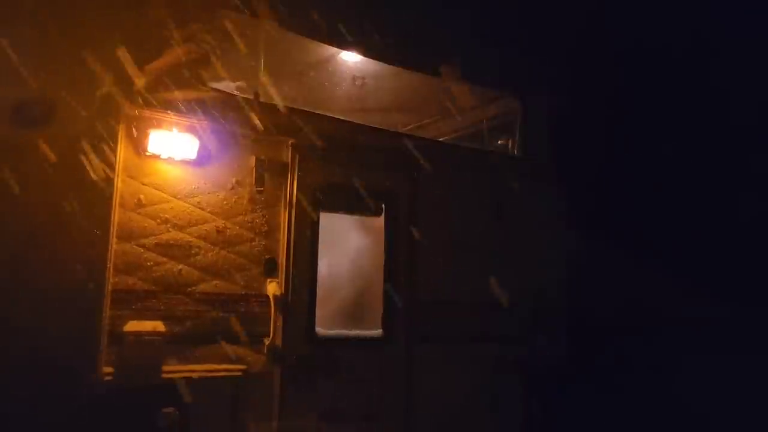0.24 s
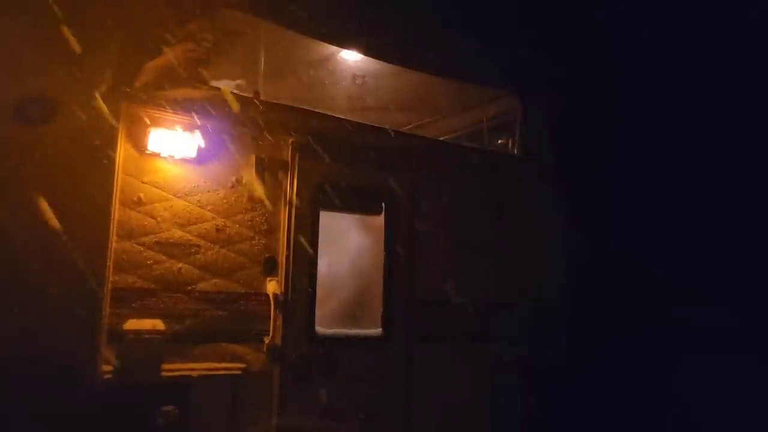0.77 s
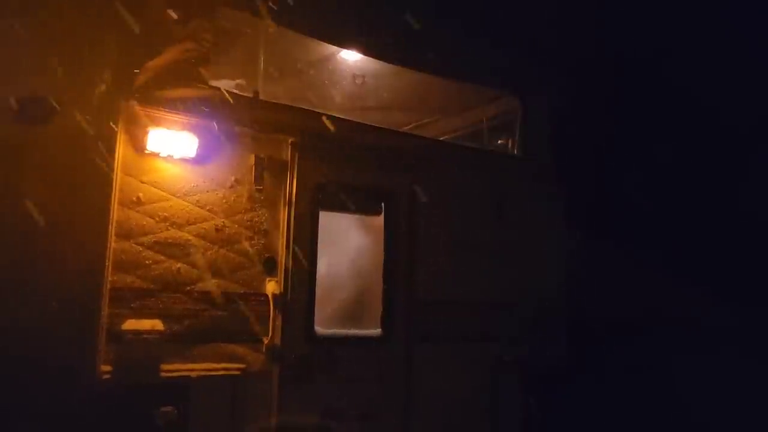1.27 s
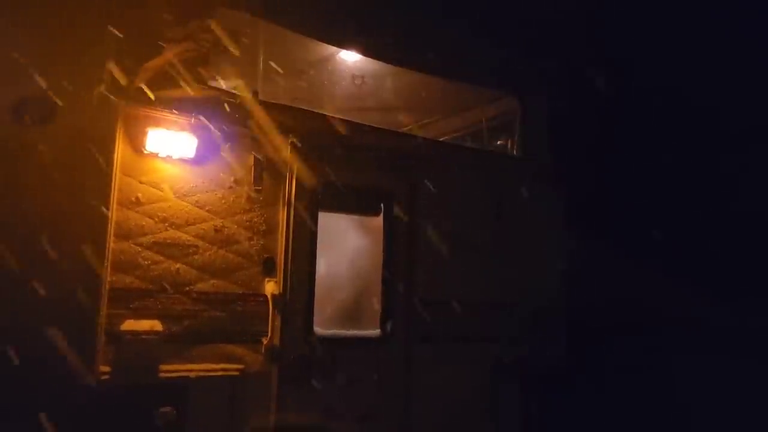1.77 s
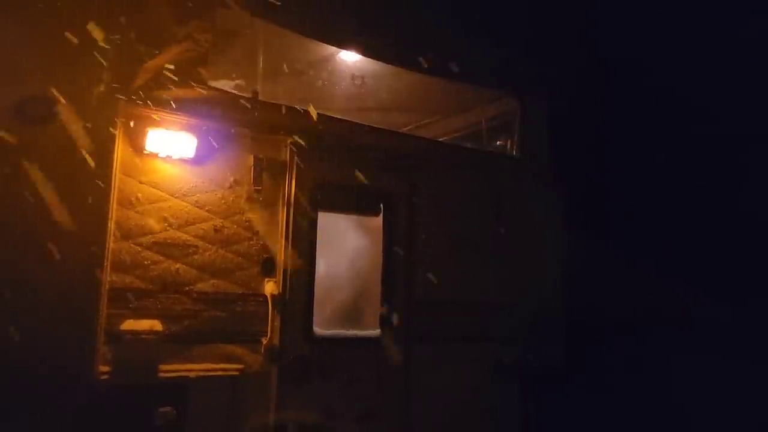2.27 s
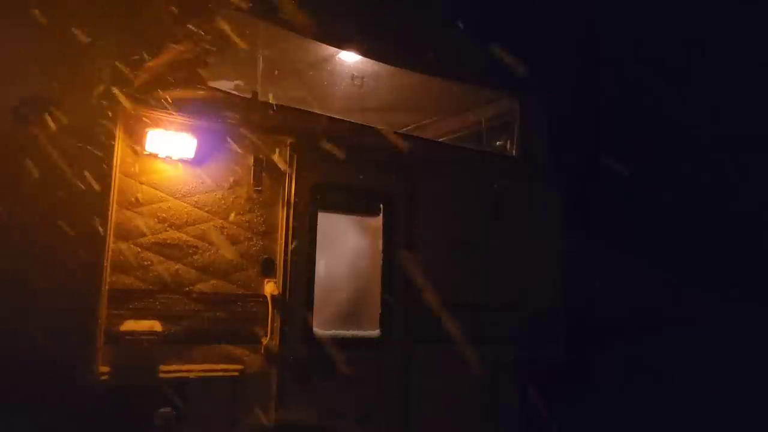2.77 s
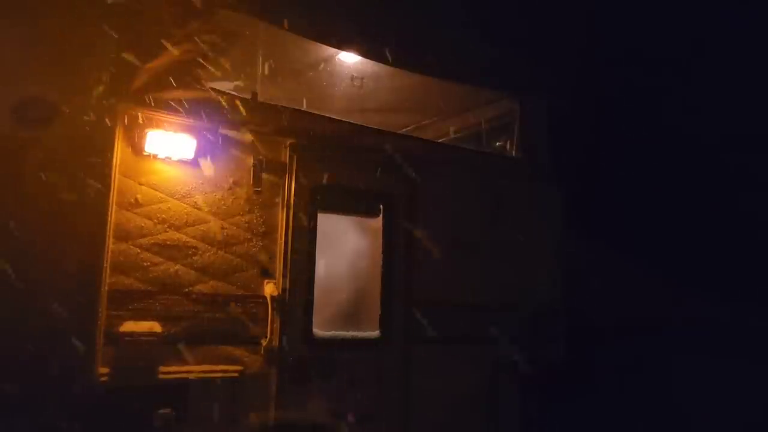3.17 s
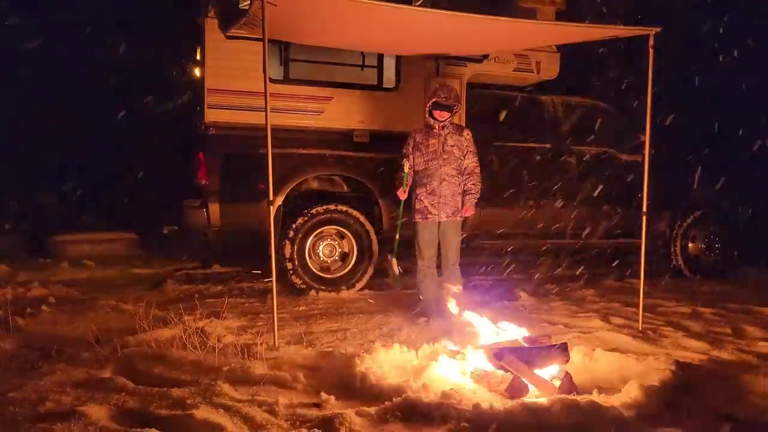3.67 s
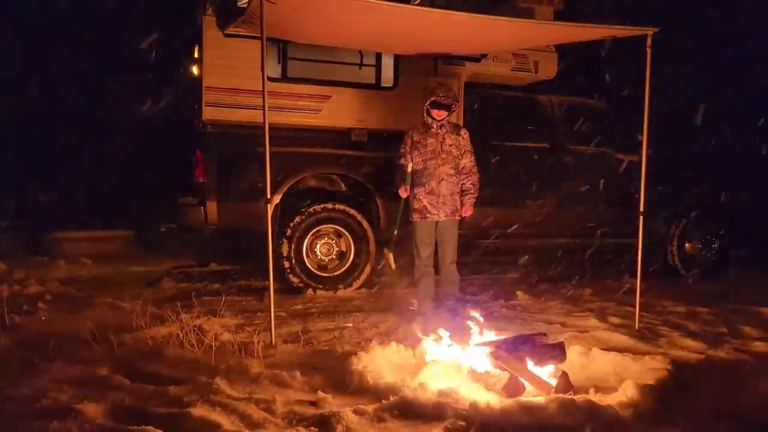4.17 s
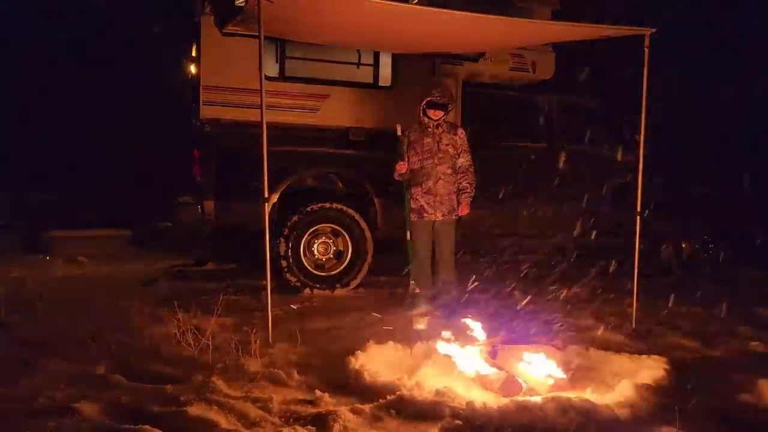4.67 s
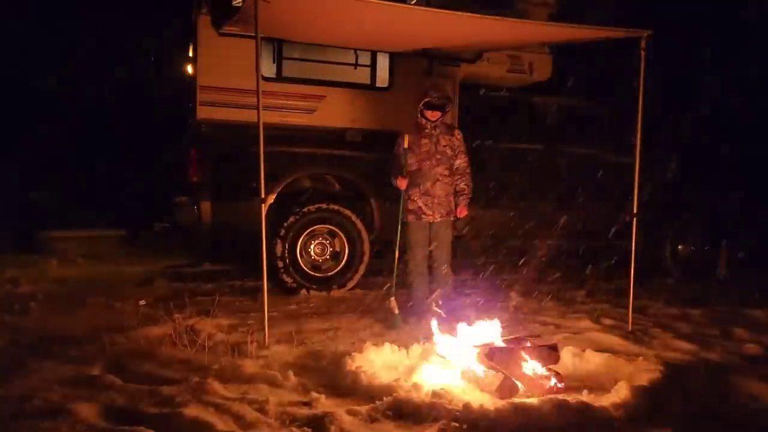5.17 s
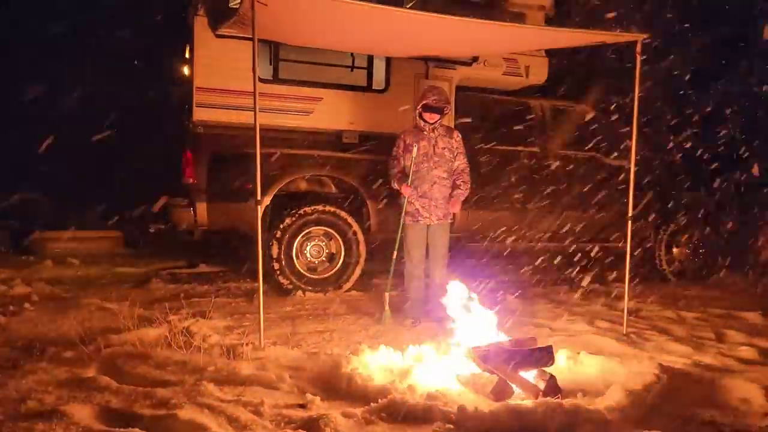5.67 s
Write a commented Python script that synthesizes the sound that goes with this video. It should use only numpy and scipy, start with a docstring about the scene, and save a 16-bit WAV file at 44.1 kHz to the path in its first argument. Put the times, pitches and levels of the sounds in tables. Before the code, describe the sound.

Storm wind and sleet are heard outdoors for about six seconds. From the first instant, gusts buffet the microphone with a lumpy low rumble, quick flutters that shift between left and right, and irregular dull thumps, strongest around 0.6, 1.1, 2.2 and 2.8 seconds. A faint roar of air lies behind. Over this runs a steady, bright, grainy hiss of ice pellets landing on everything nearby. Single pellets tick sharply on the microphone housing, on one side or the other, some with a tiny brief ring. They stand out around 0.3, 1.0 to 1.3, 1.7 and 2.1 seconds, with the sharpest on the left at 3.3 seconds. At about 3.6 seconds the hiss drops, as though in a more sheltered place, and ticks become sparser. The wind eases around 4.5 seconds, then gusts again from about 5 to 5.7 seconds, with a couple of ticks on the right.

```python
"""Storm wind and sleet at night

Wind buffets the two microphone openings (ports) of a small camera: a lumpy rumble with single thumps.
Driven ice pellets hiss on everything near, and some tick on the housing beside one port. Some strikes
ring briefly, at times together with a tick. After about 3.6 s the camera is in a more sheltered place
and the hiss drops."""
import sys
import numpy as np
from scipy import signal
from scipy.fft import rfft, irfft
from scipy.io import wavfile
from scipy.ndimage import uniform_filter1d

SR = 44100
rng = np.random.default_rng(int(sys.argv[2]) if len(sys.argv) > 2 else 0)


def persist_wave(psi):
    """Save psi, clipped to +-1, as 16-bit WAV."""
    counts = np.round(np.clip(psi, -1, 1) * 32767).astype(np.int16)
    wavfile.write(sys.argv[1], SR, np.atleast_2d(counts).T)


N = 261513  # samples, about 5.9 s
PORT_LAG = 22  # samples that sound needs to reach the far port


def gain(db):
    """Turn decibels into a number to multiply by."""
    return 10 ** (np.asarray(db) / 20)


def unit_power(x):
    """Scale a signal to an average power of 1."""
    return x / np.sqrt(np.mean(x ** 2) + 1e-20)


def at_pitch(table, hz):
    """Read a table's columns at these frequencies, gliding between rows."""
    pitches, *columns = np.transpose(table)
    return np.array([np.interp(np.log(hz + 1), np.log(pitches + 1), c) for c in columns])


def at_time(table, t):
    """Read a table's columns at these times, gliding between rows."""
    times, *columns = np.transpose(table)
    return [np.interp(t, times, c) for c in columns]


def sides(pan_db):
    """Left and right gains: the far port is turned down."""
    return gain(np.minimum(0, np.array([pan_db, -pan_db])))


def add(mix, start_s, sound):
    """Mix a sound in at its start time."""
    part = mix[:, max(round(start_s * SR), 0):][:, :sound.shape[1]]
    part += sound[:, :part.shape[1]]


def lumpy_noise(tone, likeness, size, lumps_db, bins, frames):
    """Partly alike left and right noise with random loud spots, `bins` tall and `frames` long."""
    hz = np.fft.rfftfreq(size, 1 / SR)
    a, b, c, d, lumps = rng.standard_normal((4 * N // size + 6, len(hz), 5)).T
    lumps = unit_power(uniform_filter1d(uniform_filter1d(lumps, bins, 0), frames, 1))
    alike = np.clip(likeness(hz), -1, 1)[..., None]
    left, unrelated = a + 1j * b, c + 1j * d
    spectra = np.array([left, alike * left + np.sqrt(1 - alike ** 2) * unrelated])
    spectra *= gain(at_pitch(tone, hz)[0][:, None] + lumps_db * lumps)
    spectra[:, hz >= tone[-1][0]] = 0  # silent above the table's last row
    return unit_power(signal.istft(spectra, nperseg=size, noverlap=3 * size // 4)[1][:, :N])


# Slow changes in the wind: (time [s], rumble level [dB], roar level [dB])
WIND_STRENGTH = [(0.0, -15.5, -53), (0.08, -38, -50), (0.21, -28, -47.5), (0.3, -39.5, -50),
                 (0.51, -28, -47), (0.68, -31, -51), (0.83, -32.5, -48.5), (1.32, -33.5, -50),
                 (1.45, -33.5, -50), (1.78, -33, -47.5), (2.23, -34.5, -52), (2.48, -32, -50),
                 (2.69, -34, -48), (2.94, -38, -49), (3.07, -35, -51.5), (3.4, -31, -50),
                 (3.53, -36, -49.5), (3.8, -44, -49.5), (3.93, -31.5, -51), (4.11, -38.5, -48),
                 (4.41, -41.5, -50), (4.64, -45, -47.5), (4.79, -36, -46), (5.04, -32, -45),
                 (5.47, -32, -51.5), (5.65, -28, -47), (5.93, -51, -49)]
# Quick gusts across a port: (time [s], flutter level [dB], lean to the left [dB, used at 0.8 times])
GUSTS = [(0.0, -39, -4), (0.03, -43, -7), (0.13, -42, 10), (0.2, -47, -11), (0.36, -36, 2),
         (0.43, -35.5, -17), (0.48, -29.5, -13), (0.58, -25.5, -17), (0.64, -37, -4), (0.78, -40, -6),
         (0.86, -36.5, -6), (0.91, -44, -3), (1.02, -39, 4), (1.07, -44, 9), (1.25, -41, 9.5),
         (1.32, -50, -1.5), (1.42, -39, -13), (1.45, -38.5, -10), (1.6, -33.5, -16), (1.65, -46, -15),
         (1.77, -43, -10), (1.83, -41, -6.5), (1.9, -37, 9), (1.95, -36.5, -13), (2.06, -40.5, -12),
         (2.11, -38.5, -1), (2.18, -34, 5), (2.21, -43.5, -11), (2.51, -41.5, -11), (2.54, -33.5, -7),
         (2.59, -40, -4), (2.69, -40.5, -6), (2.76, -36, 4), (2.84, -31.5, 1.5), (2.87, -42, -0.5),
         (2.96, -42, -5), (3.34, -36, -7), (3.45, -38, -9), (3.6, -35.5, -2), (3.65, -41.5, 16),
         (3.71, -33, 16), (3.76, -37, 2), (3.83, -34, 13), (3.88, -44, -7), (3.96, -36, -6.5),
         (4.01, -36.5, -0.5), (4.08, -42, 0), (4.23, -39.5, -12), (4.36, -48, -19), (4.39, -34, -6),
         (4.49, -49.5, -11), (4.56, -41, 0), (4.84, -38.5, 6), (4.94, -40.5, -1), (5.02, -40.5, -5),
         (5.2, -33.5, 6), (5.24, -41, 13), (5.32, -25.5, 0), (5.38, -39.5, 3), (5.4, -37, -2),
         (5.55, -33, 8), (5.6, -36.5, 0.0), (5.93, -39.5, 2)]
# The tone of each wind noise: (frequency [Hz], relative level [dB])
RUMBLE_TONE = [(12, -13), (28, 19), (45, 9), (62, 9.5), (90, 6.5), (130, -32)]
FLUTTER_TONE = [(60, -9.5), (100, 16), (140, 7), (200, -3.5), (280, -7.5), (420, -19), (600, -33)]
ROAR_TONE = [(150, -23), (240, 0), (330, -6), (450, -9), (650, -9.5), (1000, -21), (1500, -22), (2200, -51)]
# How alike the roar is at both ports: (frequency [Hz], likeness [1 same, -1 opposite])
ROAR_LIKENESS = [(130, 0.97), (300, 1), (650, 0.7), (1000, 0.7), (1400, -0.8)]

def wind():
    """Broad swirls of air rumble at both ports, small ones flutter at one, and air further off roars."""
    t = np.arange(N) / SR
    rumble_db, roar_db = at_time(WIND_STRENGTH, t)
    flutter_db, lean_db = at_time(GUSTS, t)
    rumble = lumpy_noise(RUMBLE_TONE, lambda hz: .85, size=2048, lumps_db=2, bins=3, frames=3)
    flutter = lumpy_noise(FLUTTER_TONE, lambda hz: .75, size=1024, lumps_db=3, bins=4, frames=3)
    roar = lumpy_noise(ROAR_TONE, lambda hz: at_pitch(ROAR_LIKENESS, hz)[0],
                       size=1024, lumps_db=1, bins=18, frames=6)
    flutter *= gain(flutter_db + lean_db * np.array([[.4], [-.4]]))
    return gain(rumble_db) * rumble + flutter + gain(roar_db) * roar


def patter(per_s, spread_db, cycles):
    """Tiny pellets of many sizes each ring for a few cycles; each port hears different ones."""
    strength = gain(spread_db * np.minimum(rng.exponential(1, (2, N)), 4))
    hits = strength * (rng.random((2, N)) < per_s / SR)
    pitches = np.geomspace(1200, 15000, 14)
    kind = rng.choice(len(pitches), (2, N), p=pitches / pitches.sum())
    out = np.zeros((2, N))
    for k, hz in enumerate(pitches):
        t = np.arange(int(2 * cycles * SR / hz)) / SR
        grain = np.sin(2 * np.pi * hz * t) * t * np.exp(-t * hz / cycles * 4.7)
        out += signal.oaconvolve(hits * (kind == k), grain[None] / np.linalg.norm(grain), axes=1)[:, :N]
    return unit_power(out)


# How hard the sleet falls:
# (time [s], hiss level before SWELL_STRETCH [dB], left minus right [dB], boost from coarse pellets [dB])
SLEET_STRENGTH = [(0, -37, -1, 0), (.04, -36.5, -1, -0.5), (.2, -36.5, 1.5, 0), (.27, -35.5, -1, 2),
                  (.31, -36.5, 1, 1.5), (.66, -36.5, -0.5, 0), (.73, -36, -0.5, 0.5), (.8, -36, -0.5, -1),
                  (1.1, -36, -1, -0.5), (1.25, -36.5, -2, -1), (1.285, -35.5, -0.5, 3),
                  (1.32, -36.5, -1, 0.5), (1.55, -36, 0.5, -1.5), (1.75, -37, 1, 0.5),
                  (2.06, -35.5, -1, -1.5), (2.16, -36.5, 1, -1.5), (2.195, -35.5, -1, 3.5),
                  (2.23, -36.5, 0, -1), (2.6, -36, -0.5, -1), (2.85, -36, -1, -1.5), (3.2, -36, -.5, 0),
                  (3.4, -36.3, -.5, 0), (3.55, -36.5, -1, 0), (3.585, -35.5, -4.5, 2),
                  (3.65, -39.5, 0.5, -1), (3.78, -40, -0.5, 2), (3.9, -39, 0, 1.5), (4.21, -39, 0, 1),
                  (4.5, -38, -1, 0.5), (5.05, -39, -0.5, 1.5), (5.4, -38.5, -1, 1), (5.7, -38.5, 0, 1),
                  (5.93, -39.5, 1, 0.5)]
# How much the hiss's rises and dips in dB are enlarged: (frequency [Hz], stretch [times])
SWELL_STRETCH = [(1000, 1.2), (3000, 2.3), (8000, 1.57), (14000, 2.65)]
# The tone each port gives the ice: (frequency [Hz], left relative level [dB], right relative level [dB])
PORT_TONE = [(600, -32, -30), (1000, -21, -19), (1400, -19, -16), (2000, -18, -11), (2800, -17, -9),
             (3600, -14, -9), (4600, -14, -7), (5600, -11, -10), (7600, -8, -13), (8600, -12, -17),
             (9600, -13, -22), (10400, -10, -17), (11500, -6, -11), (12900, 0, -10.5), (14000, -4.5, -13.5),
             (15200, -5, -14)]
# The hiss dies away in the highest treble: (frequency [Hz], level change [dB])
TREBLE_FADE = [(15400, 0), (15650, -5), (15850, -55)]

def sleet(near_share=.33, coarse_hz=3300):
    """Far pellets merge into a hiss while near ones stay grainy; each port shapes their tone."""
    near = np.sqrt(near_share) * patter(per_s=2500, spread_db=1.5, cycles=4.3)
    far = np.sqrt(1 - near_share) * rng.standard_normal((2, N))
    pellets = near + far
    pellets[1] += .1 * np.roll(pellets[0], PORT_LAG)  # a little of the left reaches the right port
    slicing = dict(nperseg=512, noverlap=384)
    hz, t, spectra = signal.stft(pellets, SR, **slicing)  # indexed by port, frequency, time
    level_db, pan_db, coarse_db = at_time(SLEET_STRENGTH, t)
    clumps = uniform_filter1d(rng.standard_normal((len(t), 2)), 4, 0)  # pellets land in clumps
    patches = rng.standard_normal((len(t), len(hz), 2)).T  # the tone flickers too
    patches = uniform_filter1d(uniform_filter1d(patches, 20, 1), 10, 2)
    flicker_db = 1.1 * (unit_power(clumps).T[:, None] + unit_power(patches))
    tone_db = at_pitch(PORT_TONE, hz) + at_pitch(TREBLE_FADE, hz)
    spectra *= gain(tone_db[:, :, None] + flicker_db)
    mono = signal.istft(spectra.mean(0), **slicing)[1]
    spectra /= np.sqrt(np.mean(mono ** 2))
    coarse_band = np.exp(-np.log((hz[:, None] + 1) / coarse_hz) ** 2 / 1.9)  # coarse pellets sound lower
    swell_db = at_pitch(SWELL_STRETCH, hz)[0][:, None] * (level_db - level_db.mean())
    side_db = np.array([.5, -.5])[:, None, None] * pan_db
    spectra *= gain(level_db.mean() + swell_db + coarse_db * coarse_band + side_db)
    return signal.istft(spectra, **slicing)[1][:, :N]


# Large swirls of air that press on both ports:
# (middle time [s], level [dB], pitch [Hz], length of the loud part [ms], left minus right [dB])
THUMPS = [(0.009, -25, 54.4, 7.5, 0), (0.05, -25, 49.5, 19, -1), (0.094, -26.5, 68.6, 20.6, 1),
          (0.164, -24, 49.1, 58, 0), (0.264, -26.5, 57.5, 30, -3), (0.447, -21.5, 72, 17.3, -6),
          (0.491, -30, 90, 24, 1), (0.547, -20, 76, 11.7, 5), (0.609, -16, 70, 28.6, -4),
          (0.653, -20, 56, 47, 1), (0.807, -21, 54.3, 45, 1), (0.862, -28, 106, 10.3, -4),
          (0.915, -28.5, 61.4, 27.5, 2), (0.999, -31, 94, 26, -3), (1.1, -18.5, 71.5, 19, -4),
          (1.286, -28.5, 48.6, 33.7, -10), (1.333, -24.5, 61, 29, 5), (1.441, -28.5, 52, 16, 2),
          (1.575, -25, 60, 19.6, -4), (1.6, -22, 77, 18, -8), (1.628, -23.5, 37.7, 29.5, -7),
          (1.641, -24.5, 50, 11, 4), (1.744, -23, 69.6, 12.6, 1), (1.768, -26, 48, 19.6, 2),
          (1.827, -32, 50, 22, -4), (1.864, -20.5, 53, 20.7, -1), (1.935, -25, 63.8, 52, -3),
          (2.0, -25, 71, 13.3, -5), (2.088, -30, 60, 35, 2), (2.189, -17, 70.5, 20.8, 3),
          (2.281, -24.5, 45.2, 18.4, -2), (2.321, -32, 52, 16, 4), (2.411, -22.5, 57, 15.6, -1),
          (2.483, -20, 56, 28, 2), (2.55, -22.5, 38.2, 26, 2), (2.632, -22, 49.7, 28, -1),
          (2.759, -18, 67.6, 21.3, 5), (2.785, -24, 36, 10.5, 9), (2.827, -23.5, 76, 12, 0),
          (2.99, -33, 40, 17, 0), (3.161, -29, 69, 9.7, 1), (3.218, -21.5, 69, 16, 3),
          (3.254, -35, 95, 14, -13), (3.318, -20, 62.3, 19, -2), (3.377, -36, 67, 17, 0),
          (3.418, -29.5, 61, 29, 2), (3.466, -22, 54.7, 19, 1), (3.561, -25.5, 53.2, 48, -1),
          (3.59, -33, 81, 25, -3), (3.73, -26.5, 106, 16, 9), (3.815, -27, 94, 17, 5),
          (3.842, -28.5, 91, 15, 14), (3.98, -28.5, 45.2, 39, 3), (4.025, -23.5, 77.5, 15, 0),
          (4.116, -29.5, 48, 15, 2), (4.606, -29, 47.3, 36, 0), (4.68, -30.5, 70.6, 23.5, -2),
          (4.8, -33.5, 44, 18, 5), (4.842, -27.5, 57.5, 22, 1), (4.887, -26.5, 62, 10.5, 3),
          (4.959, -28.5, 96, 10.2, 2), (5.085, -26.5, 68, 10.7, -3), (5.162, -27.5, 65.4, 12.3, 0),
          (5.196, -23, 71, 16.8, 3), (5.293, -30, 76.5, 20, 8), (5.361, -33, 102, 13.6, 0),
          (5.394, -29.5, 65, 12.5, 7), (5.467, -24.5, 53.3, 27, 1), (5.529, -25, 65.5, 12.7, 2),
          (5.56, -27.5, 32, 27, 0), (5.58, -24, 57, 12, 1.5), (5.799, -29, 45.7, 30, 0),
          (5.9, -32, 45, 18, 0)]

def thumps():
    """Each large swirl makes a few swings of air pressure whose pitch sags."""
    out = np.zeros((2, N))
    for (s, db, hz, ms, pan_db), (phase, sag, lag) in zip(THUMPS, rng.random((len(THUMPS), 3))):
        progress = np.linspace(-1, 1, int(2.077 * ms * SR / 1000))
        port_shift = np.array([[.08], [-.08]]) * (lag - .5)
        turns = np.cumsum(hz * (1 - .6 * sag * progress)) / SR + phase + port_shift
        swing = np.sqrt(2) * np.cos(2 * np.pi * turns) * np.cos(np.pi * progress / 2) ** 2
        add(out, s - len(progress) / 2 / SR, gain(db + np.array([[.5], [-.5]]) * pan_db) * swing)
    return out


# Pellets that hit the camera housing:
# (time [s], knock level [dB], click level [dB], fizz level [dB], length [ms], left minus right [dB])
HOUSING_HITS = [(0.031, -31, -39, -19, 1.6, 17), (0.135, -50, -25, -34, 1.1, -9),
                (0.203, -46, -39, -25, 0.7, -15), (0.27, -41, -33, -33, 0.9, -21),
                (0.2734, -53, -21, -15, 1.8, 24), (0.3363, -48, -27, -22, 1.5, -13),
                (0.635, -62, -47, -32, 0.9, -2), (1.005, -39, -31, -15, 1.7, 21),
                (1.0058, -34, -42, -25, 0.99, -9), (1.046, -53, -30, -21, 0.92, 18),
                (1.2136, -53, -46, -21, 1.3, 15), (1.283, -50.5, -25, -40, 1.5, -17),
                (1.4123, -41, -26, -27, 1.5, 22), (1.6394, -28.5, -41, -32, 1.3, 9),
                (1.6466, -19, -16, -43, 0.37, 26), (1.6905, -32, -37, -7.5, 2.1, 21),
                (1.9682, -46, -42, -26, 1.5, -15), (2.0282, -48, -24, -32, 1.8, -15),
                (2.044, -40, -36, -27, 1.5, -15), (2.0672, -30, -25, -23, 0.6, -11),
                (2.0804, -44, -25, -21, 1.5, -19), (2.0891, -33, -22, -25, 2.4, -21),
                (2.1943, -29, -20, -28, 0.42, 24), (2.1956, -31, -34, -40, 1.5, -20),
                (2.2793, -53, -44, -18, 1.2, 15), (2.2803, -51, -41, -25, 0.94, -15),
                (2.479, -50, -43, -20, 1.4, 17), (3.0076, -35, -41, -23, 1.3, -15),
                (3.0805, -42, -26, -23, 0.88, 39), (3.268, -50, -28, -24, 0.7, -15),
                (3.3022, -24, -6, -6, 1.7, 38), (3.305, -55, -17, -32, 0.39, -17),
                (3.422, -51, -29, -20, 1.3, 15), (3.5827, -26, -24, -38, 0.5, -6),
                (3.8058, -39, -33, -36, 1.3, -15), (3.806, -51, -46, -20, 0.51, 7),
                (4.2796, -51, -30, -26, 0.59, -18), (4.3158, -35, -55, -44, 0.37, -26),
                (4.3461, -56, -42, -21, 1.1, 17), (4.3462, -38, -37, -22, 0.55, -11),
                (5.0331, -52, -47, -25, 1.3, 15), (5.1033, -34, -24, -19.5, 0.7, -19),
                (5.173, -33, -19, -26, 0.4, -16), (5.7408, -43, -47, -33, 0.5, -11)]
# Where the knock, click and fizz lie: (lowest frequency [Hz], highest frequency [Hz])
TICK_BANDS = [(400, 1800), (1800, 7000), (7000, 17000)]

def ticks(size=1024, top_hz=15700):
    """A pellet shatters in about a millisecond; its knock, click and fizz ring through the nearer port."""
    out = np.zeros((2, N))
    hz = np.fft.rfftfreq(size, 1 / SR)
    t_ms = (np.arange(size) - size / 2) * 1000 / SR
    tones = gain(.9 * at_pitch(PORT_TONE, np.maximum(hz, 7000))) / (1 + (hz / top_hz) ** 80)
    for s, *band_db, ms, pan_db in HOUSING_HITS:
        push = (rng.standard_normal(size) - 1) * np.exp(-(2 * t_ms / ms) ** 2)  # one gritty inward push
        crack = rfft(push) * tones[int(pan_db < 0)]
        bands = [irfft(crack / (1 + (lo / (hz + 1)) ** 6) / (1 + (hz / hi) ** 6)) for lo, hi in TICK_BANDS]
        tick = sum(gain(db) * band / np.linalg.norm(band) for db, band in zip(band_db, bands))
        tick *= np.sqrt(SR / 2000)  # 0 dB has the energy of a full-size tone lasting 1 ms
        late = np.roll(tick, PORT_LAG)
        both = np.array([tick, late] if pan_db > 0 else [late, tick])
        add(out, s - size / 2 / SR, sides(pan_db)[:, None] * both)
    return out


# Brief pitched rings of pellet strikes, some sounding together with a tick on the housing:
# (time [s], level [dB], pitch [Hz], length of the loud part [ms], left minus right [dB])
PELLET_RINGS = [(0.0842, -27.5, 2140, 2, -5), (0.135, -28, 5100, 1.9, -12), (0.2612, -32, 6718, 1.8, -7),
                (0.2663, -38, 2928, 3.3, -2), (0.2699, -27, 4550, 6.3, -7), (0.3244, -30, 2940, 1.8, 6),
                (0.5413, -41, 1370, 1.9, -21), (0.6509, -32.5, 1200, 0.97, -6),
                (0.7351, -26, 4220, 3.3, -12), (0.9339, -39, 2411, 1.9, 5), (1.105, -30, 6160, 4.8, 8),
                (1.153, -35, 5570, 1.9, -6), (1.2604, -36, 5970, 1.9, -2), (1.277, -27.5, 3300, 4, -8),
                (1.2844, -24.5, 4070, 3.3, -9), (1.291, -26, 3600, 3, -8), (1.616, -29, 2067, 1.4, -4),
                (1.6468, -21, 505, 4.1, 15), (1.928, -29.5, 1370, 1.8, -1), (2.068, -36, 861, 1.9, -10),
                (2.1747, -34, 1378, 1.5, 0), (2.1863, -31, 6029, 3.9, 0), (2.2052, -33, 1930, 5.5, -13),
                (2.8067, -28, 3962, 1.8, 2), (2.8655, -30.5, 1770, 4.6, -3), (2.88, -33.5, 2740, 2.8, -4),
                (2.8981, -37, 2900, 4.8, 17), (3.1354, -34, 2360, 2.6, -4), (3.2718, -34, 1378, 1.6, -15),
                (3.302, -23, 1150, 2.44, 20), (3.3022, -21, 3320, 1.2, 18), (3.4859, -40, 1750, 3.6, -7),
                (4.0417, -39, 1510, 3.5, -11), (4.2122, -29, 3760, 3.3, -5), (4.3153, -30, 2583, 1.6, -3),
                (4.5061, -40, 1540, 2.1, -12), (4.8327, -38, 2756, 7.7, -4), (5.104, -33.5, 1480, 3.1, -14),
                (5.173, -27, 2400, 1.5, -18), (5.6475, -38, 1900, 4, 3)]

def rings():
    """A pellet makes whatever it strikes ring briefly; the pitch wavers as the ice breaks."""
    out = np.zeros((2, N))
    for s, db, hz, ms, pan_db in PELLET_RINGS:
        phase, lag, *bends = rng.standard_normal(10)
        age = np.arange(int(3 * ms * SR / 1000)) * 1000 / SR / ms  # runs from 0 to 3
        wobble = 1 + .17 * np.interp(age, np.linspace(0, 3, len(bends)), bends)
        turns = np.cumsum(hz * wobble) / SR + phase + lag * np.array([[.18], [-.18]])
        ring = 3 * age * np.exp(1 - 3 * age) * np.sin(2 * np.pi * turns)
        add(out, s - .4 * ms / 1000, np.sqrt(2) * gain(db) * sides(pan_db)[:, None] * ring)
    return out


def scene():
    """Wind and ice together, in stereo."""
    return wind() + thumps() + sleet() + ticks() + rings()


def record(dry):
    """Clip any peak beyond full scale, then remove the very highest treble."""
    low_pass = signal.firwin(511, cutoff=16500, window=("kaiser", 9), fs=SR)
    return signal.oaconvolve(np.clip(dry, -1, 1), low_pass[None], "same", axes=1)


dry = scene()
out = record(dry)
persist_wave(out)
```